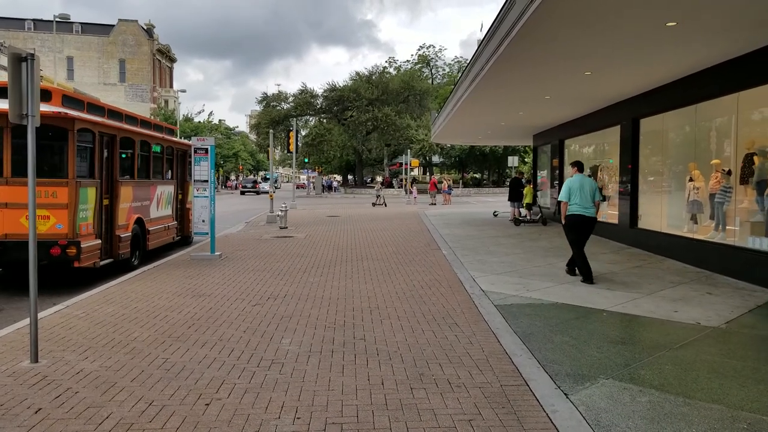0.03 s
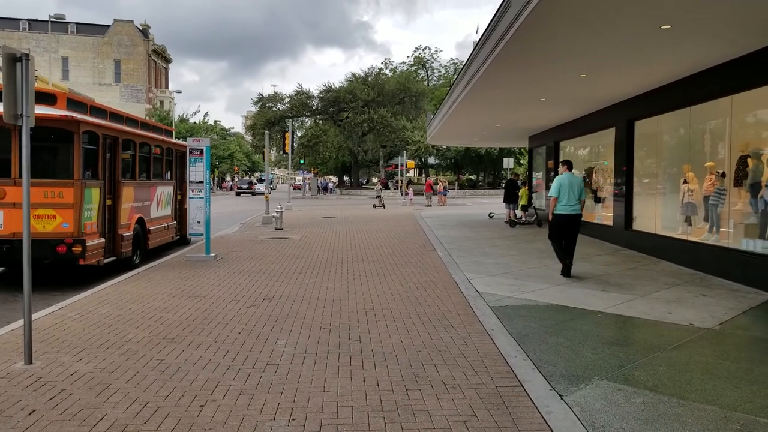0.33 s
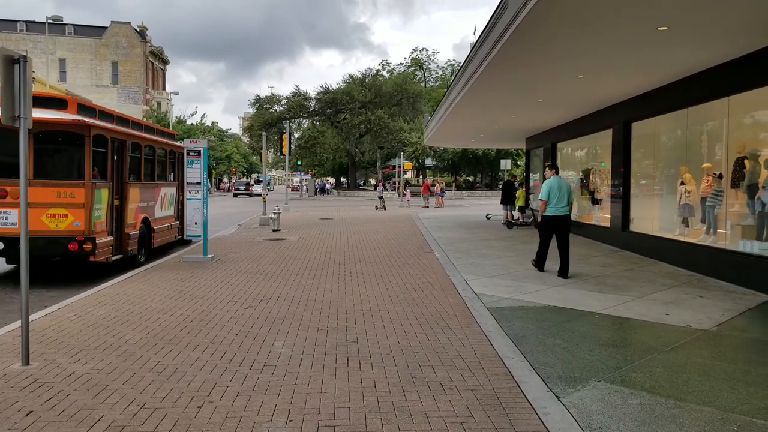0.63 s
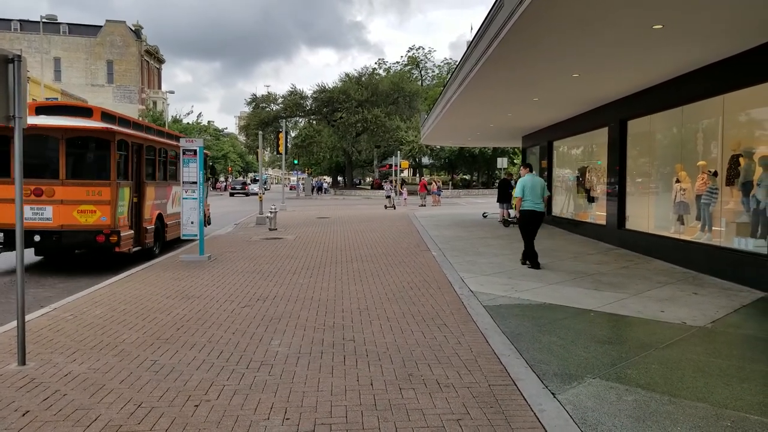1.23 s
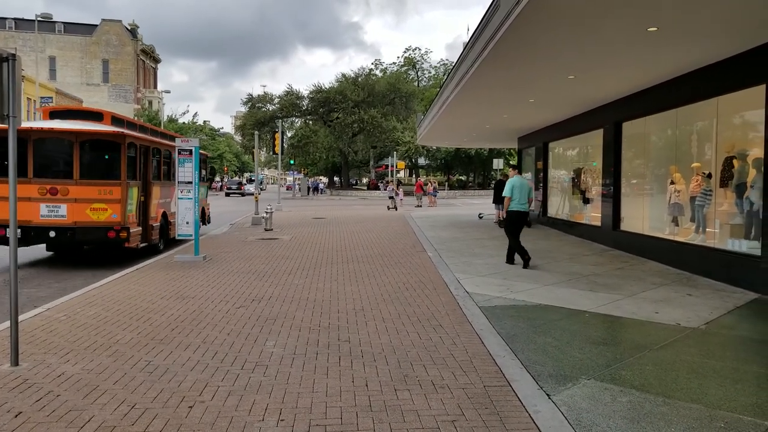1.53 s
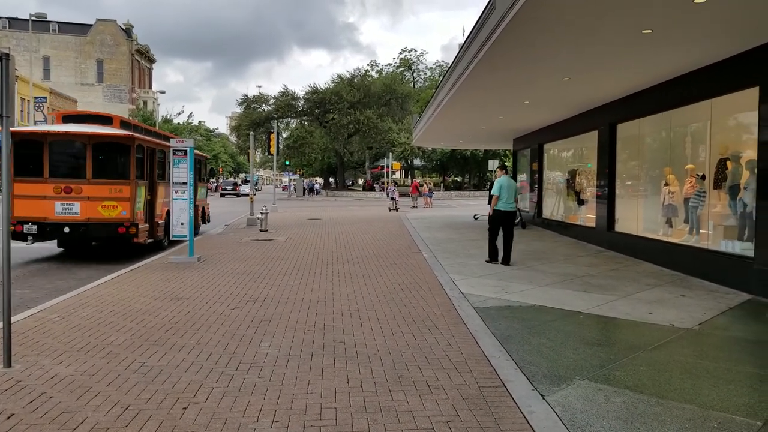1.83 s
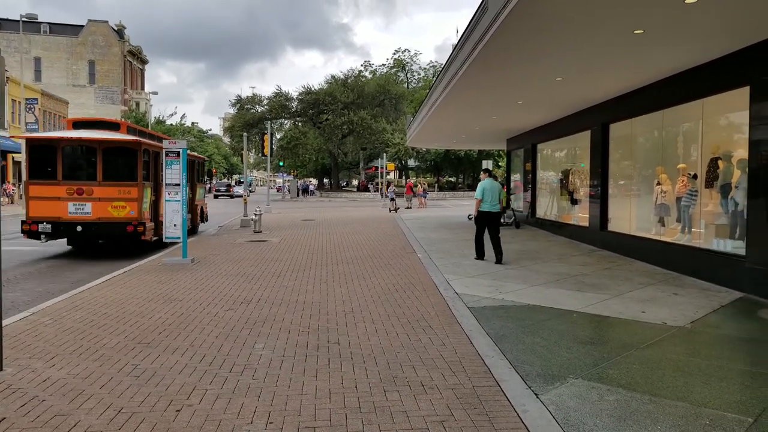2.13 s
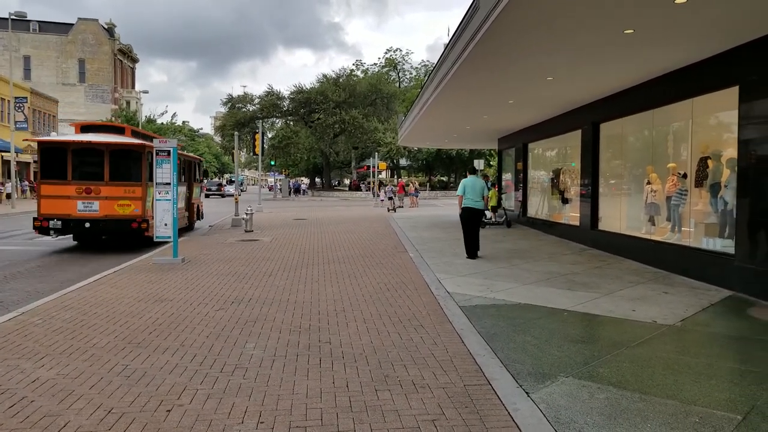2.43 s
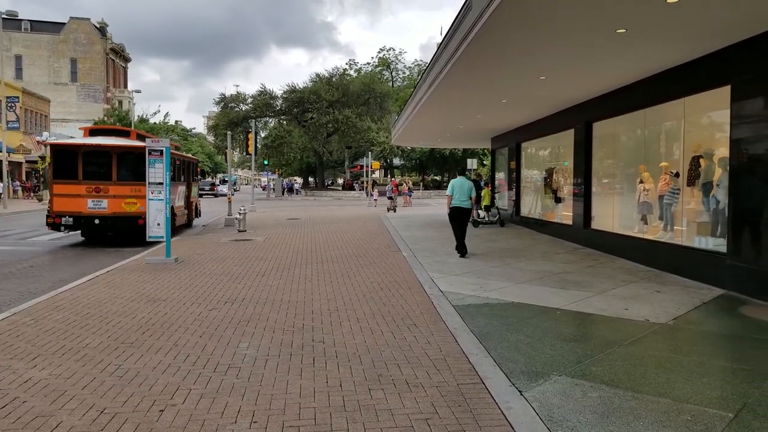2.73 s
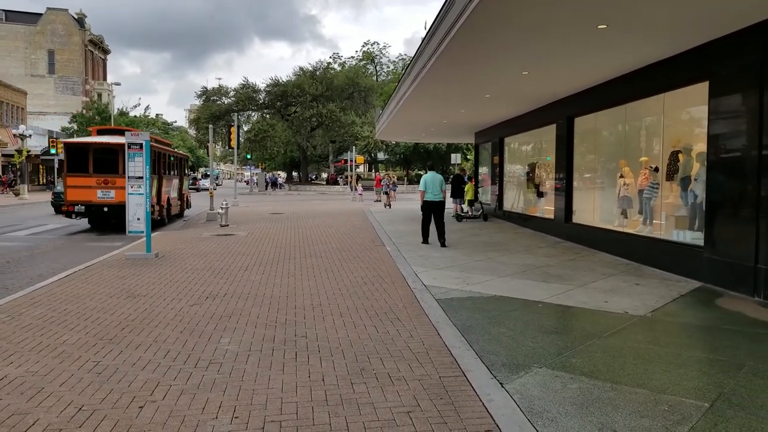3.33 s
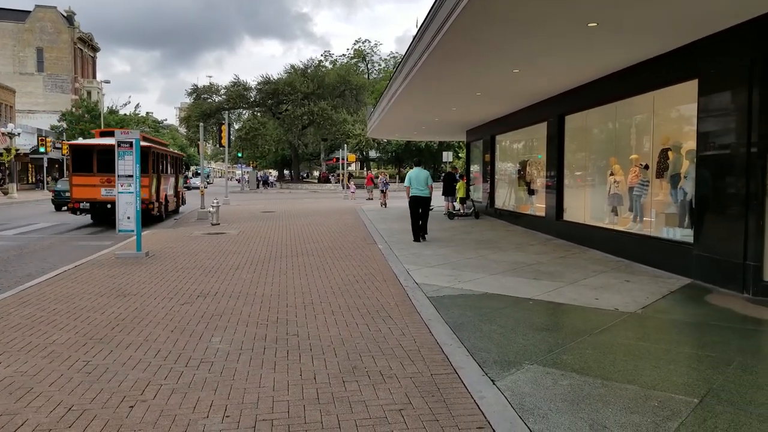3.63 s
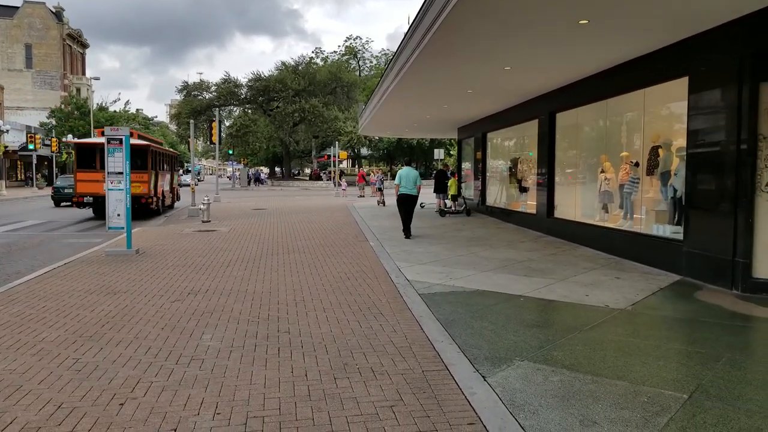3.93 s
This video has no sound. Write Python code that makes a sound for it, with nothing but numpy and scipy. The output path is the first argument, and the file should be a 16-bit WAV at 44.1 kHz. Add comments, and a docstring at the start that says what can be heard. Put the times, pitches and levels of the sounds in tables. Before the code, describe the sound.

On a city street, a bus pulls away slightly left of the microphone, its low engine growling and rising in speed. The drone softens briefly, then returns with a faint high turbo whistle, while distant traffic washes underneath.

```python
"""A bus engine drones and booms, a little to the left, as it pulls away down a city street.
It climbs in speed, sweeping its exhaust note through resonances, eases off and pulls again.
The firings also drive a growl, a ringing moan, combustion rasp and air hiss.
Intake and turbo whistle thinly on top; road rumble and street wash lie underneath."""
import sys
import numpy as np
from scipy import signal
from scipy.fft import rfft, irfft
from scipy.io import wavfile
from scipy.ndimage import uniform_filter1d, minimum_filter1d, map_coordinates

SR = 44100
rng = np.random.default_rng(int(sys.argv[2]) if len(sys.argv) > 2 else 0)


def dump_mix(stems):
    """Bounce the given channels to the path in sys.argv[1] as a 16-bit WAV at rate SR."""
    frames = np.atleast_2d(stems).T  # one column per channel
    limited = np.clip(frames, -1, 1)  # hard clip at full scale
    pcm = np.round(limited * 32767).astype(np.int16)
    wavfile.write(sys.argv[1], SR, pcm)


N = 176400
T = np.arange(N) / SR
HZ = np.fft.rfftfreq(N, 1 / SR)


def amp(db):
    """Decibels to gain."""
    return 10 ** (np.asarray(db) / 20)


def unit(x):
    """Scale to rms 1."""
    return x / np.sqrt(np.mean(x ** 2) + 1e-20)


def curve(rows, column=1):
    """One column of a time table at every sample."""
    rows = np.array(rows, float)
    return np.interp(T, rows[:, 0], rows[:, column])


def colour(rows, hz):
    """Spectrum table read on a log-frequency axis."""
    freq_hz, value = np.transpose(rows)
    return np.interp(np.log(hz + 1), np.log(np.sort(freq_hz) + 1), value)


def drift(rate_hz):
    """Low-passed noise, rms 1."""
    return unit(irfft(rfft(rng.standard_normal(N)) * np.exp(-.5 * (HZ / rate_hz) ** 2), N))


def wander(rate_hz, points=800):
    """Slow drift drawn on a coarse grid, rms 1."""
    hz = np.fft.rfftfreq(points, T[-1] / points)
    slow = unit(irfft(rfft(rng.standard_normal(points)) * np.exp(-.5 * (hz / rate_hz) ** 2)))
    return np.interp(T, np.linspace(0, T[-1], points), slow)


def from_left(pair, left_db):
    """Left up, right down, each by left_db."""
    return np.array(pair) * amp([[left_db], [-left_db]])


def noise(spectrum, left_db):
    """Coloured stereo noise: near mono in the bass, diffuse in the treble."""
    # left-right likeness: freq_hz, coherence
    likeness = [(60, .99), (150, .97), (350, .85), (650, .66), (1100, .58), (2000, .2), (4400, .3),
                (7000, .1), (12000, .08)]
    left, other = rfft(rng.standard_normal((2, N))) * amp(colour(spectrum, HZ))
    coherence = np.clip(colour(likeness, HZ), 0, 1)
    right = coherence * left + np.sqrt(1 - coherence ** 2) * other
    pair = from_left(irfft(np.array([left, right]), N), left_db)
    return pair / np.std(pair.mean(0))


def pulsing(crank_rad, depth):
    """Gain with a puff at each firing, two per turn, alternately strong and weak."""
    puffs = 1.4 * np.cos(2 * crank_rad) + .12 * np.cos(crank_rad) + .088 * np.cos(4 * crank_rad)
    return unit(np.exp(depth * puffs))


def engine_order(order, crank_hz, phase_rad, level_db):
    """One stereo partial; street reflections shift its phase between left and right."""
    shift_rad = .38 * order * crank_hz / 500 * wander(rate_hz=3)  # .38 rad rms at 500 Hz
    return np.sqrt(2) * amp(level_db) * np.cos([phase_rad + shift_rad, phase_rad - shift_rad])


def street():
    """Road rumble under the wash of tyres and far traffic."""
    # envelopes: time_s, level_db
    rumble_level = [(0, -28), (.6, -27.5), (1.5, -27.5), (2.1, -30), (2.5, -30.5), (3.2, -29.5), (4, -26.5)]
    wash_level = [(0, -30), (1.5, -30), (2.5, -31), (3.3, -29), (4, -28)]
    # spectra: freq_hz, density_db
    rumble_spectrum = [(15, -28), (28, -4), (45, 3.5), (75, 4.5), (130, 5.5), (230, 3), (330, -9),
                       (500, -4), (1200, -47)]
    wash_spectrum = [(40, -36), (250, 3), (600, -5), (850, -1), (1150, -4.5), (1500, -12), (2000, -13),
                     (3000, -20.5), (4300, -24.5), (5300, -32), (6500, -32.5), (8300, -48), (11000, -29),
                     (15500, -50)]
    rumble = noise(rumble_spectrum, left_db=3.3) * amp(curve(rumble_level))
    wash = noise(wash_spectrum, left_db=.15) * amp(curve(wash_level) + .5 * drift(rate_hz=16))
    return rumble + wash


def turbo(width_hz=310):
    """A fuzzy whistle spools up and sinks back, in airy fizz that puffs as the bus gathers speed."""
    # whistle: time_s, pitch_hz, level_db
    spool = [(2, 9700, -76), (2.3, 10100, -78), (2.5, 10700, -68), (2.75, 11250, -55), (2.88, 11600, -64),
             (3.08, 12100, -55), (3.27, 12300, -57), (3.45, 11900, -63), (4, 10900, -72)]
    # fizz envelope: time_s, level_db
    fizz_level = [(0, -68), (1.2, -69), (1.8, -70), (2.3, -62), (3.1, -53), (4, -48.5)]
    # fizz spectrum: freq_hz, density_db
    fizz_spectrum = [(4000, 6), (6000, -1.5), (8400, -17), (10200, 2), (11300, -6), (12500, -2),
                     (14000, -8), (16000, -28)]
    # air puffs: centre_s, half_length_s, level_db
    puffs = [(.42, .16, -63), (.96, .09, -54), (1.42, .075, -56)]
    carrier = np.exp(2j * np.pi * np.cumsum(curve(spool)) / SR)
    fuzz = [drift(width_hz / 2) + 1j * drift(width_hz / 2) for _ in range(2)]
    whistle = np.array([unit((carrier * side).real) for side in fuzz]) * amp(curve(spool, column=2))
    puff_power = sum(amp(db) ** 2 * np.exp(-((T - at_s) / half_s) ** 2) for at_s, half_s, db in puffs)
    fizz_power = amp(curve(fizz_level)) ** 2 + puff_power
    return whistle + noise(fizz_spectrum, left_db=1.5) * np.sqrt(fizz_power)


def intake():
    """Air whistles through the intake in a narrow band of noise."""
    # envelope: time_s, level_db
    level = [(0, -59), (.45, -53), (.8, -47.5), (1.1, -56), (1.55, -53), (1.8, -73), (2.05, -58),
             (2.5, -58.5), (4, -74)]
    # whistle band: freq_hz, density_db
    spectrum = [(3000, -52), (4100, -11.5), (4450, 0), (4750, -2.5), (5100, -21), (7000, -54.5)]
    return noise(spectrum, left_db=1.0) * amp(curve(level))


def rasp_and_hiss(crank_rad):
    """Combustion rasp and air hiss, both pulsing with the cylinders."""
    # envelopes: time_s, level_db
    rasp_level = [(0, -26.5), (.3, -36.5), (.55, -29.5), (.8, -30.5), (1.02, -29), (1.22, -29),
                  (1.6, -31.5), (1.95, -33.5), (2.45, -32), (2.85, -32), (3.4, -27), (4, -34)]
    hiss_level = [(0, -54.5), (.5, -55), (.9, -49.5), (1.15, -48), (1.4, -43), (1.7, -47.5), (2, -46.5),
                  (2.4, -55.5), (2.9, -61), (3.4, -50.5), (4, -49.5)]
    # spectra: freq_hz, density_db
    rasp_spectrum = [(200, -8), (330, -4), (460, -9), (560, -3.5), (640, 3), (740, 2), (880, -21),
                     (1050, -4.5), (1400, -15), (2200, -29), (3200, -29), (7000, -60)]
    hiss_spectrum = [(1200, -27), (2100, 6), (2900, -11), (3600, -0.5), (4500, 6), (5300, -1.5),
                     (6300, -12.5), (8300, -24), (11200, -26.5), (15500, -31)]
    rasp = noise(rasp_spectrum, left_db=-.07) * amp(curve(rasp_level) + .88 * drift(rate_hz=13))
    hiss = noise(hiss_spectrum, left_db=1.5) * amp(curve(hiss_level) + .98 * drift(rate_hz=13))
    return rasp * pulsing(crank_rad, depth=.32) + hiss * pulsing(crank_rad, depth=.25)


def moan(crank_rad):
    """Firings keep the engine bay panels ringing at fixed pitches."""
    # envelope: time_s, level_db
    level = [(0, -39), (.55, -27.5), (.8, -30.5), (1.02, -32), (1.2, -38), (1.42, -26), (1.68, -29),
             (1.95, -35), (2.4, -47), (4, -42)]
    # panel resonances: freq_hz, density_db
    panels = [(400, -50), (515, -27), (537, -13), (570, -24), (605, -14), (628, 1), (650, -8), (672, -4),
              (705, -11), (755, -11), (830, -28), (980, -30), (1040, -15), (1110, -32), (1500, -60)]
    return noise(panels, left_db=.4) * amp(curve(level)) * pulsing(crank_rad, depth=.64)


def growl(crank_hz, crank_rad):
    """High whole and half orders flare and fade as they sweep through the engine bay resonances."""
    # envelope: time_s, gain_db
    envelope = [(0, -38.5), (.5, -31.5), (.8, -38), (1.05, -32.5), (1.22, -37), (1.6, -33.5), (2, -37),
                (2.5, -37.5), (3, -35.5), (3.4, -33.5), (4, -32.5)]
    # bay resonances: freq_hz, gain_db
    bay = [(220, -7), (330, -3.5), (400, -11), (450, -6), (500, -4), (560, -6), (630, -0.5), (700, -4.5),
           (800, -11), (900, -17.5), (1040, -10.5), (1200, -27)]
    # dulling with distance: time_s, slope_db_per_octave
    tilt = [(0, 1), (1.7, -1.5), (2.4, -4), (4, -4)]
    wobble_db, pivot_hz = 3.5, 550
    half_order_db = -9  # half orders come from unequal cylinders
    pair = np.zeros((2, N))
    for order in [5.5, 6.5, *np.arange(7.5, 20, .5), *range(20, 29)]:
        pitch_hz = order * crank_hz
        level_db = curve(envelope) + colour(bay, pitch_hz) + half_order_db * (order % 1 > 0)
        level_db += wobble_db * wander(rate_hz=3.9)
        level_db += curve(tilt) * np.log2(pitch_hz / pivot_hz)
        phase_rad = order * crank_rad + 2 * np.pi * rng.random()
        pair += engine_order(order, crank_hz, phase_rad, level_db)
    return from_left(pair, left_db=.9)


def exhaust(crank_hz, crank_rad):
    """Exhaust pulses as engine orders: the firing note, its harmonics and odd orders between."""
    # envelopes of orders 1, 2, 4, 6: time_s, level_db
    throb = [(0, -59), (1.1, -36), (1.9, -52), (2.3, -35), (3.1, -30), (3.45, -22), (3.7, -24), (4, -28)]
    firing = [(0, -19.5), (.37, -15.5), (.53, -18.5), (.9, -17), (1.22, -19.5), (1.4, -25), (1.6, -17.5),
              (1.96, -16.5), (2.2, -22.5), (2.45, -38), (2.68, -36), (2.82, -23), (3.06, -22.5),
              (3.25, -33.5), (3.7, -19), (4, -25.5)]
    boom = [(0, -29), (.6, -28.5), (.98, -19.5), (1.2, -20.5), (1.55, -12), (1.72, -16), (1.86, -22),
            (2, -42), (2.62, -55), (2.78, -25), (2.93, -19), (3.05, -28), (3.15, -23.5), (3.3, -25),
            (3.55, -30), (3.7, -22), (3.88, -16.5), (4, -33)]
    howl = [(0, -42), (.33, -26), (.55, -34), (.9, -33), (1.2, -26), (1.45, -24), (1.75, -44), (2.2, -44),
            (2.6, -33), (2.98, -39), (3.18, -28), (3.38, -36), (3.56, -35), (3.72, -24), (3.9, -19),
            (4, -23)]
    # drone of the odd orders, from unequal cylinders: time_s, gain_db
    drone = [(0, -1), (.4, 2.5), (.7, -8), (1, -6.5), (1.3, -3.5), (1.68, -0.5), (2, -2.5), (2.27, -4),
             (2.48, -13), (2.65, -6), (2.95, -8.5), (3.3, 0.5), (3.55, -5), (3.87, -2.5), (4, -5)]
    # drone partials: order, gain_db
    odd_orders = [(3, -2), (5, -4.5), (7, -7)]
    # exhaust and body resonances: freq_hz, gain_db
    pipe = [(105, -41), (126, -22.5), (138, -13.5), (148, -20), (162, -21), (180, -20.5), (205, -47),
            (226, -22), (245, -26), (266, -20), (283, -22.5), (305, -24.5), (330, -23), (390, -23.5)]
    wobble_db = .75
    smear_rad = .282  # phase offsets between the orders soften the exhaust pulses
    levels_db = {1: curve(throb), 2: curve(firing), 4: curve(boom), 6: curve(howl)}
    for order, gain_db in odd_orders:
        drone_db = curve(drone) + gain_db + colour(pipe, order * crank_hz)
        levels_db[order] = drone_db + wobble_db * wander(rate_hz=4.9)
    pair = np.zeros((2, N))
    for order, level_db in levels_db.items():
        phase_rad = order * crank_rad + smear_rad * order ** 2
        pair += engine_order(order, crank_hz, phase_rad, level_db)
    return from_left(pair, left_db=.36)


def scene():
    """One crankshaft times the orders and pulsing; all but the growl arrives later on the right."""
    # crankshaft: time_s, speed_hz
    speed = [(0, 33.1), (.28, 36.5), (.78, 40.4), (1.01, 42.4), (1.26, 43.7), (1.54, 45.1), (1.8, 46.4),
             (1.96, 47.6), (2.36, 50.3), (2.61, 52.5), (2.85, 55), (3, 56.4), (3.3, 56.3), (3.7, 55.3),
             (3.89, 54.3), (4, 53.3)]
    # right channel lag: time_s, delay_s
    right_lag = [(0, .00028), (1.8, .00028), (2.3, .00044), (4, .00044)]
    crank_hz = curve(speed)
    jitter = .0019 * drift(rate_hz=9.5)
    crank_rad = 2 * np.pi * np.cumsum(crank_hz * (1 + jitter)) / SR
    engine = exhaust(crank_hz, crank_rad) + rasp_and_hiss(crank_rad) + moan(crank_rad)
    left, right = engine + intake() + turbo() + street()
    right = map_coordinates(right, [(T - curve(right_lag)) * SR], order=5, mode="mirror")
    return np.array([left, right]) + growl(crank_hz, crank_rad)


def record(dry):
    """Smooth peak limiter, short end fades, low-pass."""
    ceiling, fade_s, cutoff_hz = .9, .008, 15800
    gain = np.minimum(1, ceiling / (abs(dry).max(0) + 1e-9))
    gain = uniform_filter1d(minimum_filter1d(gain, size=1500), size=1400)
    gain *= np.clip(np.minimum(T, T[-1] - T) / fade_s, 0, 1)
    lowpass = signal.firwin(511, cutoff_hz, window=("kaiser", 9), fs=SR)
    return signal.oaconvolve(dry * gain, lowpass[None], "same")


dry = scene()
out = record(dry)
dump_mix(out)
```